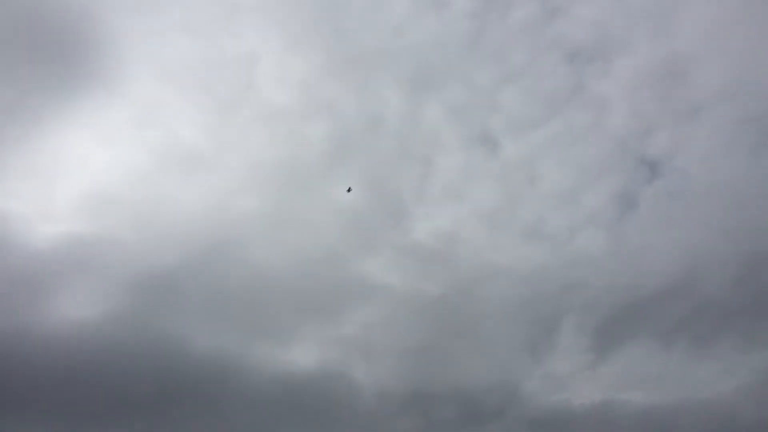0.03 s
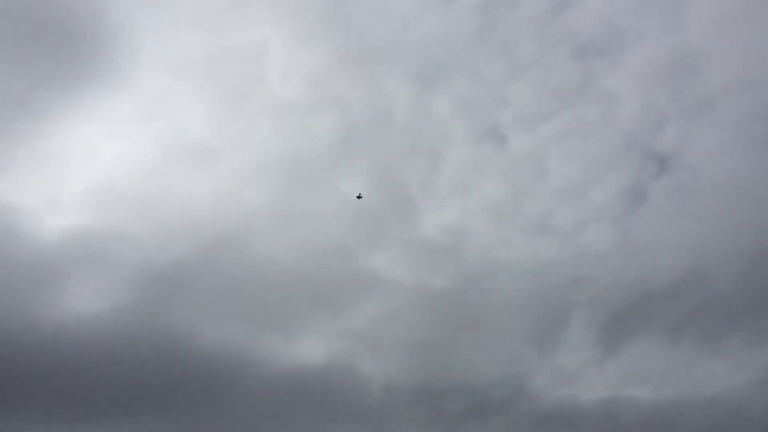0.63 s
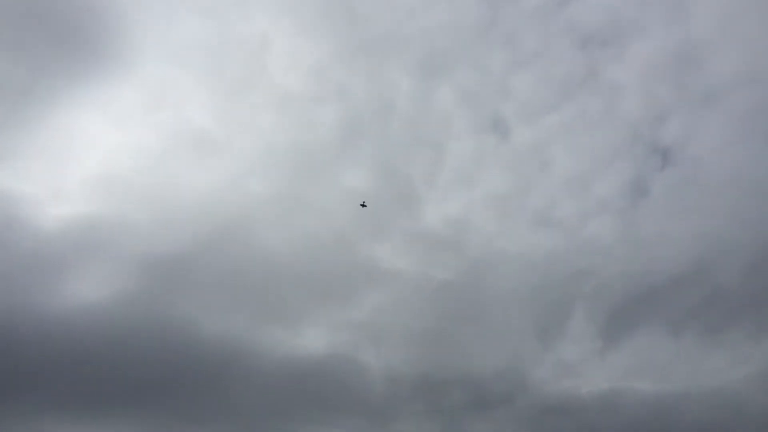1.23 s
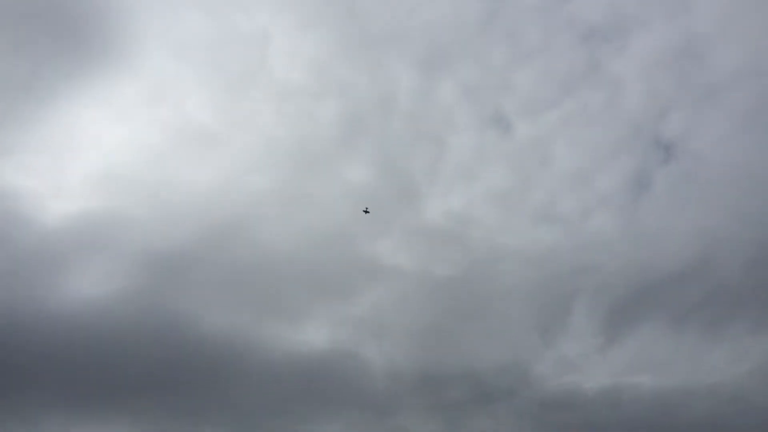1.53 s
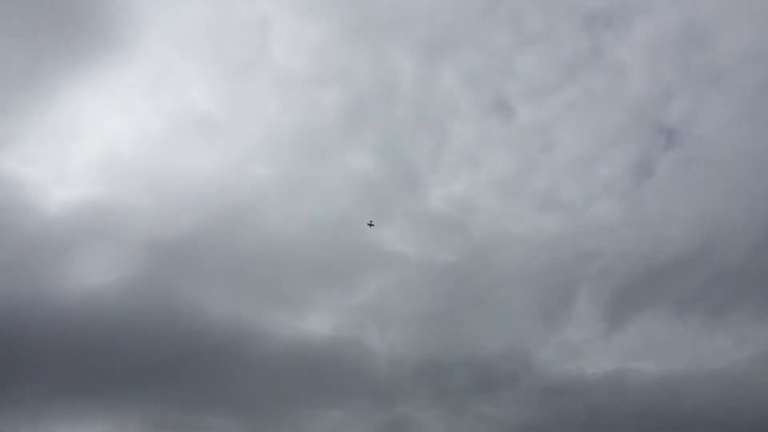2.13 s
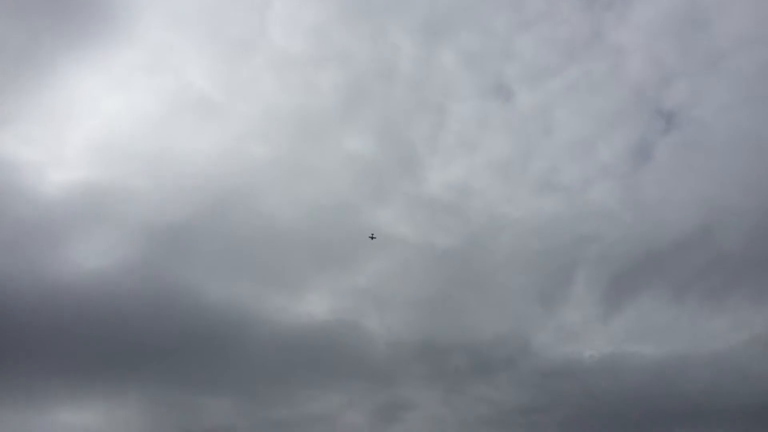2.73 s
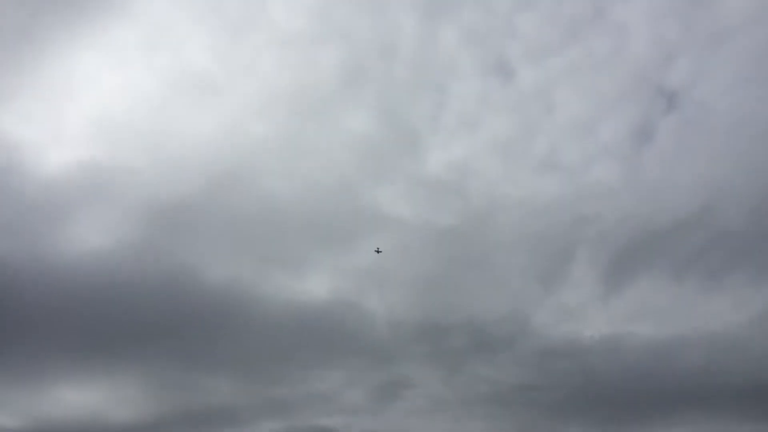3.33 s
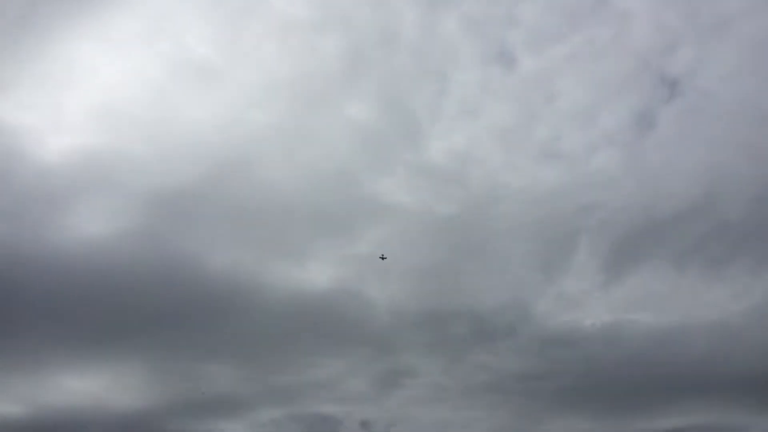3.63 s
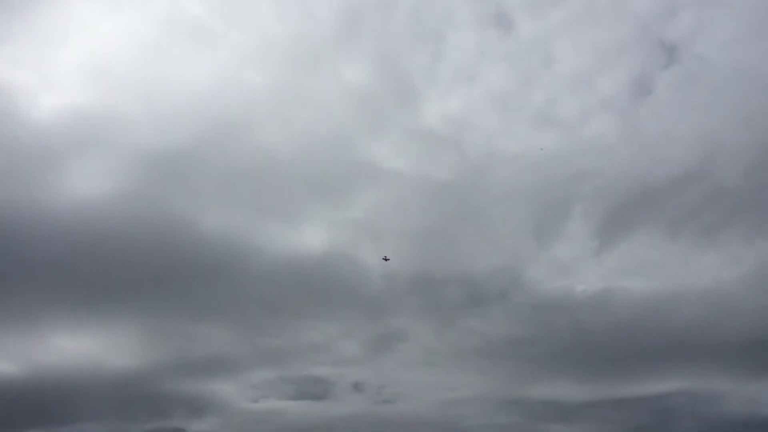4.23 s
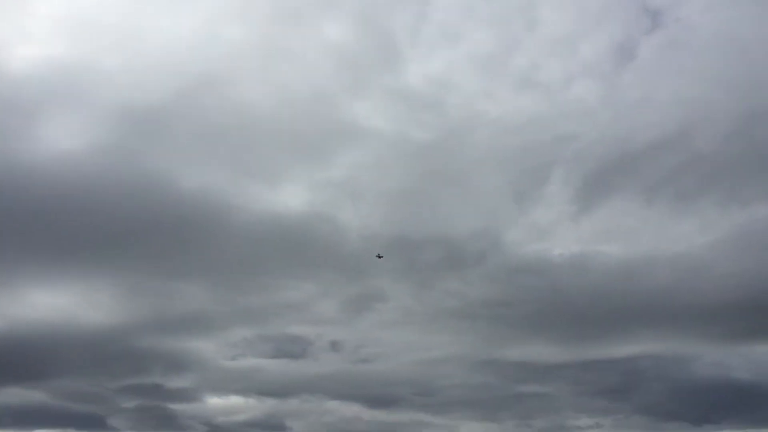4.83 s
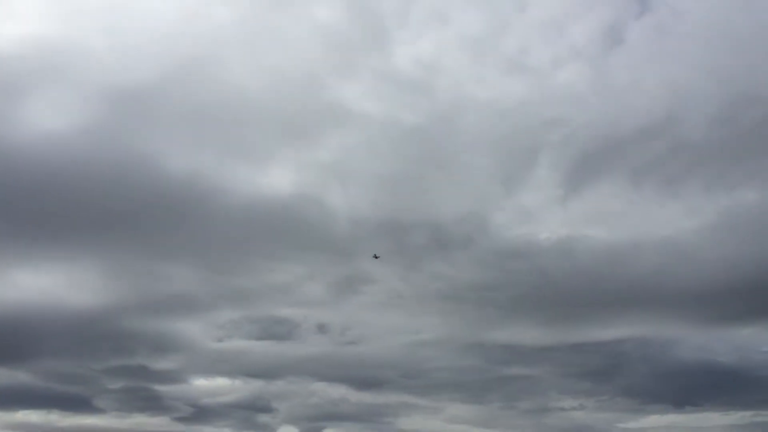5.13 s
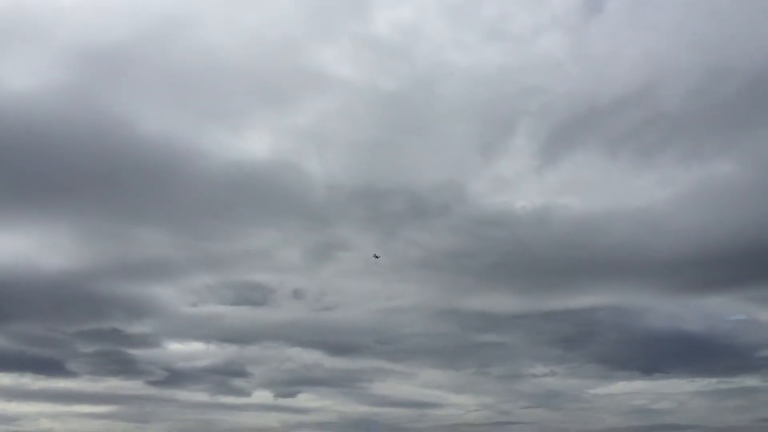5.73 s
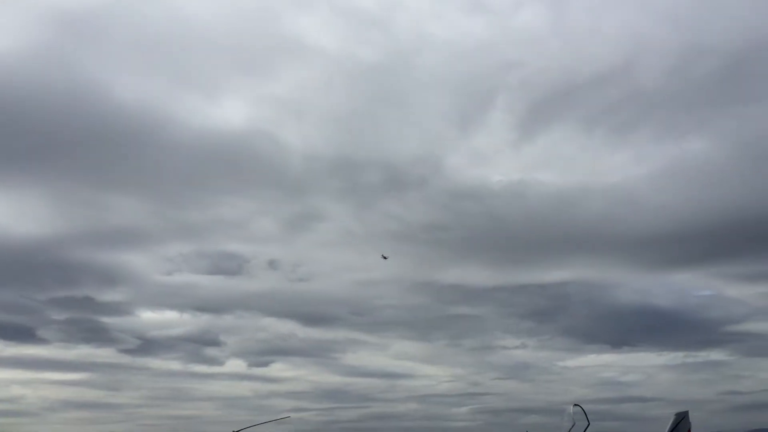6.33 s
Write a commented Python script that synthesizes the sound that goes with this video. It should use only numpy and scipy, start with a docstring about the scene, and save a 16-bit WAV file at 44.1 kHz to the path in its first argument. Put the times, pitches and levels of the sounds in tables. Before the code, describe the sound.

A light piston helicopter is heard from the ground at an open airfield for the whole six and a half seconds. Its engine holds a steady, low note, with a thin tail rotor buzz and a soft downwash rumble. The main rotor swishes and slaps about thirteen times a second inside a continuous rush of air. Sharp blade cracks come irregularly, clustering from about 1.3 to 3 seconds, again near 4 and 5 seconds, and most densely from 6 seconds, where the slapping grows hardest. Underneath, a distant propeller plane drones, swelling in and out. It is strongest around 2.5 to 3.5 seconds, and throbs briefly against the tail rotor between 3 and 4 seconds. Its pitch climbs gradually, faster in the second half, as its drone fades toward the end. The helicopter's engine pitch stays nearly unchanged throughout.

```python
"""A steady exhaust note, a tail-rotor buzz and a main rotor that swishes and slaps 13.5 times a second:
what sounds like a light piston helicopter, on an airfield under cloud. One engine speed drives the
firing note and both rotors; the blades tear the air into noise and slap as they cut their own wake.
High overhead a biplane drones in and out, its propeller pitch climbing as it dives."""
import sys
import numpy as np
from scipy import signal
from scipy.fft import rfft, irfft, next_fast_len
from scipy.io import wavfile
from scipy.ndimage import uniform_filter1d

SR = 44100
rng = np.random.default_rng(int(sys.argv[2]) if len(sys.argv) > 2 else 0)


def waveform_to_disk(signal):
    """Save audio, clipped to [-1, 1], as 16-bit WAV at the path in sys.argv[1]."""
    frames = np.transpose(np.atleast_2d(signal))
    scaled = np.clip(frames, -1, 1) * 32767
    samples = np.round(scaled).astype(np.int16)
    wavfile.write(sys.argv[1], SR, samples)


N = 289737

# Helicopter engine speed. Each row: time in seconds, firings per second.
FIRING_RATE = [(0.0, 135.79), (1.8, 135.75), (2.4, 136.06), (2.9, 135.78), (3.3, 135.46), (4.7, 135.35),
               (5.4, 135.5), (6.57, 135.53)]
# Exhaust fader. Each row: time in seconds, level in dB.
EXHAUST_LEVEL = [(0, -28), (2.3, -26.5), (3.6, -28.5), (4.5, -31.5), (5, -28.5), (6.57, -28.5)]
# Six uneven cylinders, firing note first. Each row: multiple of the four-stroke cycle, relative dB.
ENGINE_PARTIALS = [(6, 0.5), (7, -16.5), (8, -22), (9, -26), (12, -25), (13, -41.5), (21, -30.5), (28, -28),
                   (29, -27)]
FIRINGS_PER_BLADE, FIRINGS_PER_TAIL_BLADE = 10.05, 1.688
FIRST_PASS = .618  # in blade periods
# Main rotor throb. Each row: multiple of the blade rate, level in dB.
THROB_PARTIALS = [(3, -51.5), (4, -44), (5, -48.5), (6, -47.5), (7, -60), (8, -57.5), (9, -60.5),
                  (12, -55.5), (13, -58.5), (14, -58), (15, -62), (18, -60), (21, -61.5), (22, -59.5),
                  (24, -50), (47, -55.5), (78, -61)]
# Tail rotor buzz. Each row: multiple of the tail blade rate, relative level in dB.
TAIL_PARTIALS = [(1, -10), (2, -5), (4, -12), (5, -14), (6, -18), (7, -18), (8, -15), (9, -13)]
# Tail rotor fader. Each row: time in seconds, level in dB.
TAIL_LEVEL = [(0, -39.5), (.4, -38), (1.8, -50), (2.6, -42.5), (2.9, -51.5), (3.68, -46.5), (4.3, -42),
              (4.8, -42), (6.57, -36.5)]
# Throbs near 240 Hz where the tail rotor's buzz beats against the biplane's drone.
# Each row: centre and half length in seconds, level in dB.
BEAT_CUES = [(3.2, .055, -31.5), (3.37, .055, -32), (3.55, .065, -32), (3.85, .05, -31.5)]

# EQ of the torn air. Each row: frequency in Hz, relative level in dB.
RUSH_EQ = [(160, -28), (280, -0.5), (322, 1.5), (400, 0.5), (450, -2.5), (580, -1), (640, 3), (790, -3),
           (1050, -3.5), (1220, -8), (1600, -12), (2300, -17.5), (3300, -27), (4200, -35), (5000, -46.5),
           (8000, -85)]
# Body of the torn air. Each row: time in seconds, level in dB before trim.
RUSH_LEVEL = [(0, -36), (2.1, -36), (2.8, -38.5), (4.15, -35), (4.9, -36.5), (5.35, -36), (5.75, -37.5),
              (6.57, -37.5)]
# Hiss above that body. Each row: time in seconds, level in dB before trim.
HISS_LEVEL = [(0, -43.5), (1, -43.5), (1.5, -45), (2.3, -44.5), (3, -43.5), (3.8, -42.5), (4.4, -42.5),
              (4.9, -44.5), (5.4, -44), (6, -44.5), (6.57, -42.5)]
# Swish of the retreating blade between slaps. Each row: time in seconds, boost to the body in dB.
RETREAT_BOOST = [(0, 4.5), (2.5, 7), (4, 4), (5.5, 3.5), (6.57, 1)]
# EQ of the treble sizzle. Each row: frequency in Hz, relative level in dB.
SIZZLE_EQ = [(2800, -16.5), (3800, 1.5), (5600, -3.5), (6600, -10.5), (7400, -14.5), (9500, -23),
             (11000, -39.5), (15000, -38.5)]
# Sizzle faders. Each row: time in seconds, then bed and per-blade burst in dB before trim.
SIZZLE_LEVELS = [(.1, -65, -51.5), (.4, -69.5, -72), (1.25, -70, -67), (1.48, -68, -52.5), (1.8, -68, -63),
                 (2.3, -67, -52), (2.7, -68.5, -63), (3.2, -67.5, -66.5), (3.8, -66.5, -63.5),
                 (3.98, -75, -50.5), (4.06, -71, -60), (4.3, -65.5, -68), (4.85, -69.5, -67),
                 (5.7, -71, -68.5), (6, -71, -67), (6.57, -72, -55)]
# Where a blade meets the wake. Each row: time, lag after the pass, rise and fall, all in seconds.
STRIKE_SHAPE = [(.5, 0.0038, 0.0082, 0.0091), (1.5, -0.0024, 0.0042, 0.0087), (2.5, -0.004, 0.0028, 0.008),
                (3.3, 0.0033, 0.0055, 0.012), (4.2, 0.012, 0.0074, 0.015), (4.75, -0.0015, 0.0016, 0.011),
                (5.45, 0.0015, 0.002, 0.0065), (6.1, -0.0074, 0.0022, 0.0061)]
# EQ of the downwash. Each row: frequency in Hz, relative level in dB.
RUMBLE_EQ = [(15, -36), (35, -8), (55, -5.5), (100, -5), (150, -1), (200, 1.5), (270, -5.5), (340, -18.5),
             (500, -43.5), (1000, -88)]
# EQ of a blade slap. Each row: frequency in Hz, relative level in dB.
SLAP_EQ = [(200, -11.5), (500, 3.5), (1000, 4.5), (1600, 5), (2400, -1), (3500, -9), (4700, -25.5),
           (6000, -46.5), (7600, -58.5), (10000, -63), (15000, -62)]
# How hard the blades cut their wake. Each row: time in seconds, slap level in dB before trim.
SLAP_LEVEL = [(.08, -31.5), (.3, -46.5), (.7, -39), (1.2, -39.5), (1.5, -34), (2.35, -29), (2.7, -35),
              (3.3, -40.5), (3.68, -34), (3.85, -40), (4.4, -36.5), (4.85, -34), (5.1, -31), (5.75, -39),
              (6.35, -32), (6.57, -25.5)]

# The biplane fades with distance and ground reflection.
# Each row: time in seconds, second harmonic in dB, third harmonic in dB (the overtones follow it).
BIPLANE_LEVELS = [(0, -48, -51), (.5, -31.5, -47), (.95, -50, -41.5), (1.25, -31.5, -42),
                  (1.7, -41.5, -51.5), (2.45, -30.5, -43.5), (2.68, -31.5, -40.5), (2.86, -30, -44.5),
                  (3.05, -34, -38), (3.3, -32.5, -36.5), (3.68, -35.5, -45), (3.9, -36.5, -36.5),
                  (4.5, -38.5, -43), (5.6, -44, -49.5), (6.57, -65.5, -50.5)]
# Propeller overtones. Each row: multiple of the blade rate, relative level in dB.
PROPELLER_PARTIALS = [(4, 0), (5, -4), (6, -11), (7, -10)]

# Sharp blade cracks, and a few dull knocks in the rushing air. Each row: time in seconds,
# spike level in dB, pitch in Hz, half length in cycles, snap level in dB; both levels are before trim.
CRACK_AND_KNOCK_CUES = [(0.338, -22, 850.0, 0.7, -48), (0.7121, -23, 1160.0, 0.84, -43.0),
                        (1.3044, -28, 850.0, 0.62, -41.0), (1.3785, -18.5, 850.0, 0.45, -39),
                        (1.5338, -21.5, 1160.0, 0.43, -46.0), (1.7466, -19.5, 1160.0, 0.69, -47.0),
                        (1.812, -29, 1160.0, 0.5, -52), (1.9317, -23.5, 850.0, 1.1, -46),
                        (2.0464, -21, 1480.0, 0.49, -41.0), (2.1213, -18, 1280.0, 0.46, -44.0),
                        (2.189, -30, 1480.0, 2.0, -31), (2.2633, -26, 1100.0, 1.0, -43),
                        (2.343, -23, 1160.0, 0.55, -42), (2.411, -28.5, 1480.0, 1.8, -36.0),
                        (2.4902, -20.0, 850.0, 0.7, -30), (2.7076, -25, 1340.0, 1.1, -40.5),
                        (2.7925, -18.5, 1980.0, 0.8, -30.0), (2.9698, -27, 2600.0, 0.88, -34.0),
                        (3.0151, -17, 1800.0, 0.63, -29), (3.232, -23, 850.0, 1.2, -45.0),
                        (3.307, -26, 850.0, 0.5, -45.0), (3.8325, -19.5, 1550.0, 0.76, -43.0),
                        (3.9064, -22, 1800.0, 0.5, -34), (3.981, -24, 850.0, 1, -39.0),
                        (4.7862, -24.5, 1630.0, 1.8, -46), (4.8617, -20.5, 1480.0, 0.82, -42),
                        (4.9336, -19.5, 1280.0, 0.5, -41.5), (5.2331, -23.5, 850.0, 0.64, -44.0),
                        (5.3785, -22.5, 850.0, 0.79, -38.0), (5.457, -30, 1050.0, 0.68, -39.0),
                        (5.9003, -23, 1550.0, 0.34, -31), (5.9746, -20, 850.0, 0.72, -34.0),
                        (6.0487, -18.5, 850.0, 0.7, -34), (6.123, -20, 1100.0, 0.54, -29.5),
                        (6.198, -25, 1280.0, 1.6, -25), (6.2697, -23, 1480.0, 2.4, -28),
                        (6.344, -20.5, 1630.0, 2.1, -39.0), (6.4916, -22, 1550.0, 2.0, -33.5)]
# EQ of their bright snap. Each row: frequency in Hz, relative level in dB.
SNAP_EQ = [(1800, -15), (2900, 4), (4000, -1), (4900, -19.5), (6200, -21.5), (7500, -33.5), (11000, -37.5)]
# Brief swells of narrow bands: biplane overtones and rasp, an engine line, rotor air.
# Each row: centre and half length in seconds, pitch and width in Hz, level in dB.
SWELL_CUES = [(1.058, 0.094, 324, 11, -37), (2.034, 0.14, 538, 54, -39.5), (3.977, 0.31, 292, 62, -34.5),
              (4.156, 0.091, 673, 84, -39.5), (5.604, 0.59, 273, 12, -42), (6.454, 0.18, 383.4, 6.6, -39),
              (6.465, 0.21, 1450, 1700, -38.5)]
# Thin bright ticks. Each row: time in seconds, level in dB.
TICK_CUES = [(2.412, -55), (2.71, -63), (2.972, -63), (6.195, -54)]


def amp(db):
    """Decibels to gain."""
    return 10 ** (np.asarray(db) / 20)


def unit(x):
    """Scales to rms 1."""
    return x / np.sqrt(np.mean(x ** 2) + 1e-20)


def clock():
    """The time of every sample, in seconds."""
    return np.arange(N) / SR


def follow(rows):
    """Joins breakpoints by straight lines, one automation curve a column."""
    s, *columns = np.transpose(rows)
    return [np.interp(clock(), s, column) for column in columns]


def shaped(x, gain):
    """Filters x by a gain given as a function of frequency."""
    size = next_fast_len(N + 8192)
    return irfft(rfft(x, size) * gain(np.fft.rfftfreq(size, 1 / SR)), size)[:N]


def coloured(x, eq):
    """Runs x through an EQ of (Hz, dB) points and scales it to rms 1."""
    hz, db = np.transpose(eq)
    return unit(shaped(x, lambda f: amp(np.interp(np.log(f + 1), np.log(hz + 1), db))))


def drift(rate):
    """A random modulator of rms 1, with up to rate swings a second."""
    t = np.arange(8192) / 1000
    f = np.fft.rfftfreq(len(t), t[1])
    weight = (f > rate / 10) * (f < rate) / np.sqrt(f + f[1])
    slow = irfft(weight * np.exp(2j * np.pi * rng.random(len(f))))
    return unit(np.interp(clock(), t, slow))


def stack(turns, partials, flutter_db, wander_rad, rate):
    """Harmonics of a turning part; moving air shakes the level and phase of each."""
    out = np.zeros(N)
    for k, db in partials:
        level = amp(db + flutter_db * drift(rate))
        phase = 2 * np.pi * (k * turns + rng.random())
        out += level * np.sin(phase + wander_rad * drift(rate))
    return np.sqrt(2) * out


def engine(firings):
    """A steady firing note, with weak wavering lines from the six unequal cylinders."""
    cycles = firings / 6
    note = stack(cycles, ENGINE_PARTIALS[:1], flutter_db=.15, wander_rad=.044, rate=8)
    uneven = stack(cycles, ENGINE_PARTIALS[1:], flutter_db=2.5, wander_rad=.4, rate=3)
    return amp(follow(EXHAUST_LEVEL)[0]) * (note + uneven)


def rotor_throb(blades):
    """The passing main blades beat out a low, pitched throb."""
    return stack(blades, THROB_PARTIALS, flutter_db=1.5, wander_rad=.19, rate=2.3)


def tail_rotor(firings, third_db=2):
    """The geared tail blades buzz; cued throbs near 240 Hz stand for beats against the biplane's drone."""
    passes = firings / FIRINGS_PER_TAIL_BLADE
    buzz = stack(passes, TAIL_PARTIALS, flutter_db=1.5, wander_rad=.27, rate=6)
    third = stack(passes, [(3, 0)], flutter_db=.8, wander_rad=.14, rate=10)
    beats = sum(amp(db) * np.exp(-((clock() - s) / half) ** 2) for s, half, db in BEAT_CUES)
    return amp(follow(TAIL_LEVEL)[0]) * (buzz + amp(third_db) * third) + beats * third


def blade_noise(blades, memory, below_hz):
    """Noise whose low end partly repeats from one blade to the next."""
    period = round(N / blades[-1])
    passes = rng.standard_normal((N // period + 10, period))
    alike = unit(signal.lfilter([1], [1, -memory], passes, axis=0).ravel()[-N:])
    low = shaped(alike, lambda f: 1 / np.hypot(1, (f / below_hz) ** 2))
    fresh = rng.standard_normal(N)
    return low + shaped(fresh, lambda f: (f / below_hz) ** 2 / np.hypot(1, (f / below_hz) ** 2))


def patchy(x, patch_db, bins=4):
    """Eddies recolour each moment in patches some 350 Hz wide and 25 ms long, mostly in the treble."""
    hz, _, spectrum = signal.stft(x, SR, nperseg=512, noverlap=384)
    patches = uniform_filter1d(rng.standard_normal(spectrum.shape), bins, axis=0)
    patches = unit(uniform_filter1d(patches, 2 * bins, axis=1))
    depth_db = patch_db * np.interp(hz, [600, 2000], [.2, 1])[:, None]
    _, mottled = signal.istft(spectrum * amp(depth_db * patches), nperseg=512, noverlap=384)
    return unit(mottled[:N])


def since_pass(blades, lag_s):
    """Seconds from the nearest blade pass, delayed by lag_s."""
    rate = blades[-1] * SR / N
    return ((blades - FIRST_PASS - lag_s * rate + .5) % 1 - .5) / rate


def wake_strike(blades):
    """An envelope of height 1 each time a blade cuts the wake: quick attack, slower release."""
    lag, rise, fall = follow(STRIKE_SHAPE)
    t = since_pass(blades, lag)
    return np.exp(-.7 * abs(t / np.where(t < 0, rise, fall)) ** 1.08)


def rasp(firings, exhaust_db=.6, tail_db=.1):
    """A fast ripple in dB: one puff for each firing, one sharper flick for each tail blade."""
    tail = 2 * np.pi * firings / FIRINGS_PER_TAIL_BLADE
    return exhaust_db * np.cos(2 * np.pi * firings) + tail_db * (np.cos(tail) + np.cos(2 * tail))


def rush(firings, blades, split_hz=1300, body_trim_db=-3, hiss_trim_db=.02, sizzle_trim_db=-1):
    """Torn air that jumps as a blade meets the wake and swishes again as one retreats."""
    swing = np.cos(2 * np.pi * (blades - FIRST_PASS - .15))  # crests just after each pass
    strike = wake_strike(blades)
    retreat = np.exp(-(since_pass(blades, lag_s=.035) / .0065) ** 2)
    retreat_db = follow(RETREAT_BOOST)[0] * retreat

    air = patchy(coloured(blade_noise(blades, memory=.55, below_hz=1000), RUSH_EQ), patch_db=2.6)
    low_air = shaped(air, lambda f: 1 / (1 + (f / split_hz) ** 4))
    eddy_db = 1.4 * drift(250)
    body_motion_db = 2.25 * swing + 4 * strike + retreat_db + eddy_db
    body = unit(low_air) * amp(follow(RUSH_LEVEL)[0] + body_trim_db + body_motion_db)
    hiss_motion_db = 1.4 * swing + .48 * retreat_db + .89 * drift(200)
    hiss = unit(air - low_air) * amp(follow(HISS_LEVEL)[0] + hiss_trim_db + hiss_motion_db)

    fizz = patchy(coloured(rng.standard_normal(N), SIZZLE_EQ), patch_db=3)
    bed, burst = amp(follow(SIZZLE_LEVELS))
    sizzle = (bed * fizz + burst * strike * dulled(fizz)) * amp(sizzle_trim_db + 2 * drift(400))
    wind_db = .5 * drift(120) + .3 * drift(4.1)
    return (body + hiss + sizzle) * amp(wind_db + rasp(firings))


def dulled(x, edge_hz=7000, shelf_db=-11):
    """The air swallows most of the top of a sharp sound."""
    return shaped(x, lambda f: np.maximum(1 / np.hypot(1, (f / edge_hz) ** 10), amp(shelf_db)))


def rumble(blades, level_db=-40, swing_db=3.5):
    """The low churn of the downwash, pushed by each blade."""
    churn = coloured(blade_noise(blades, memory=.5, below_hz=1300), RUMBLE_EQ)
    swing = np.cos(2 * np.pi * (blades - FIRST_PASS - .14))
    return churn * amp(level_db + swing_db * swing)


def slaps(blades, trim_db=-2.1, scatter_db=-15):
    """A gritty burst for each blade, shorter and harder when the tip cuts the wake."""
    eddies = amp(3 * drift(400))
    air = blade_noise(blades, memory=.7, below_hz=700) * eddies
    grit = patchy(coloured(air, SLAP_EQ), patch_db=3)
    waver_db = -.45 * drift(16)  # no two blades strike quite alike
    slap = grit * wake_strike(blades) * amp(follow(SLAP_LEVEL)[0] + trim_db + waver_db)
    return slap + amp(scatter_db) * scattered(slap)


def scattered(x, attack_s=.0022, decay_s=.016):
    """Ground and hangars smear a sharp sound into a short tail."""
    t = np.arange(SR // 10) / SR
    tail = rng.standard_normal(len(t)) * np.exp(-t / decay_s) * (1 - np.exp(-t / attack_s))
    return signal.oaconvolve(x, tail / np.linalg.norm(tail))[:N]


def biplane(cruise_hz=80.7, dive_start_s=1.2, dive_hz_per_s2=.553, overtones_db=-9.5):
    """The far propeller: its pitch climbs away from the tail rotor's and beats against it."""
    blade_hz = cruise_hz + dive_hz_per_s2 * np.maximum(clock() - dive_start_s, 0) ** 2
    passes = np.cumsum(blade_hz) / SR
    second, third, overtones = [stack(passes, partials, flutter_db=1.6, wander_rad=.37, rate=8)
                                for partials in ([(2, 0)], [(3, 0)], PROPELLER_PARTIALS)]
    hum_gain, upper_gain = amp(follow(BIPLANE_LEVELS))
    return hum_gain * second + upper_gain * (third + amp(overtones_db) * overtones)


def cracks_and_knocks(spike_trim_db=-.5, puff_trim_db=-11, snap_trim_db=-7, puff_s=.0032, snap_s=.0012):
    """Sharp blade cracks, and a few dull knocks in the rushing air: each a spike, a puff and a snap."""
    out = np.zeros(N)
    grit = coloured(rng.standard_normal(N), SLAP_EQ)
    fizz = coloured(rng.standard_normal(N), SNAP_EQ)
    for s, db, hz, cycles, snap_db in CRACK_AND_KNOCK_CUES:
        t = clock() - s
        near = abs(t) < .015
        t = t[near]
        spike = np.sin(2 * np.pi * hz * t) * np.exp(-(hz * t / cycles) ** 2)
        puff = grit[near] * np.exp(np.minimum(t / .00018, -t / puff_s))  # quick rise, slower fall
        snap = fizz[near] * np.exp(-abs(t) / snap_s)
        out[near] += amp(db + spike_trim_db) * spike + amp(db + puff_trim_db) * puff
        out[near] += amp(snap_db + snap_trim_db) * snap
    return dulled(out)


def swells(blades):
    """Brief swells of narrow noise bands: biplane overtones and rasp, an engine line, rotor air."""
    noise = blade_noise(blades, memory=.85, below_hz=970)
    out = np.zeros(N)
    for s, half, hz, width, db in SWELL_CUES:
        band = unit(shaped(noise, lambda f: 1 / (1 + (2 * (f - hz) / width) ** 4)))
        out += amp(db) * band * np.exp(-((clock() - s) / half) ** 2)
    return out


def ticks(decay_s=.0006, corner_hz=6000):
    """A few thin ticks that reach into the top octave."""
    fizz = unit(shaped(rng.standard_normal(N), lambda f: 1 / (1 + (f / corner_hz) ** 2)))
    return fizz * sum(amp(db) * np.exp(-abs(clock() - s) / decay_s) for s, db in TICK_CUES)


def scene():
    """The mono mix: engine speed drives the helicopter's rotors; the biplane flies on its own."""
    firings = np.cumsum(follow(FIRING_RATE)[0]) / SR  # running count
    blades = firings / FIRINGS_PER_BLADE
    noises = rush(firings, blades) + slaps(blades) + cracks_and_knocks() + swells(blades)
    noises += rumble(blades)
    tones = biplane() + engine(firings) + rotor_throb(blades) + tail_rotor(firings)
    return (tones + noises + ticks())[None]


def record(dry, hiss_db=-80, edge_hz=15300):
    """A faint, even hiss under the mix, then a steep high cut."""
    hissy = dry + amp(hiss_db) * rng.standard_normal(dry.shape)
    taps = signal.firwin(511, edge_hz, window=("kaiser", 9), fs=SR)
    return signal.oaconvolve(hissy, taps[None], "same")


dry = scene()
out = record(dry)
waveform_to_disk(out)
```